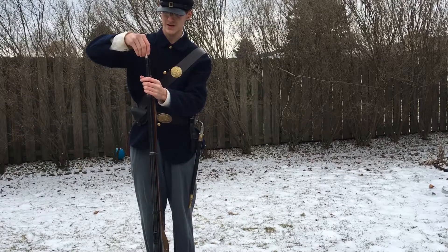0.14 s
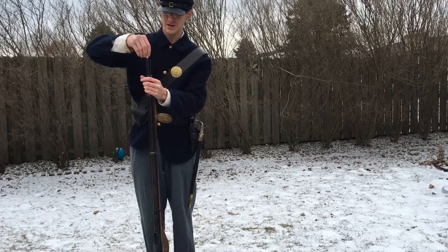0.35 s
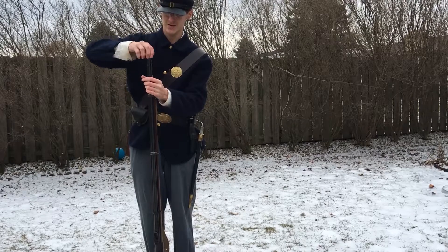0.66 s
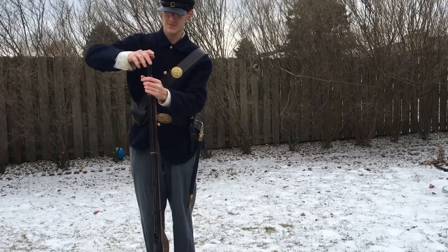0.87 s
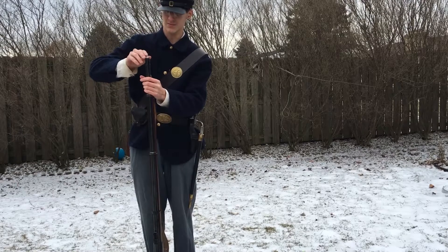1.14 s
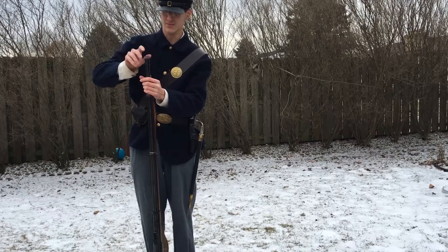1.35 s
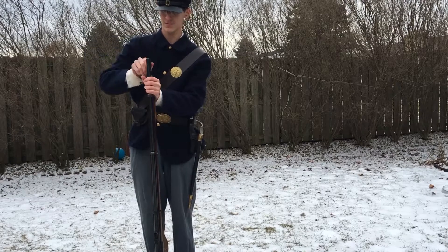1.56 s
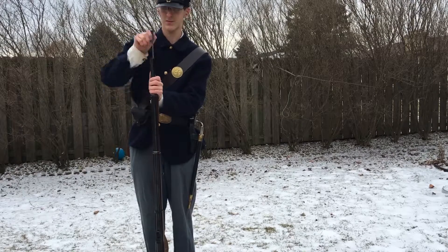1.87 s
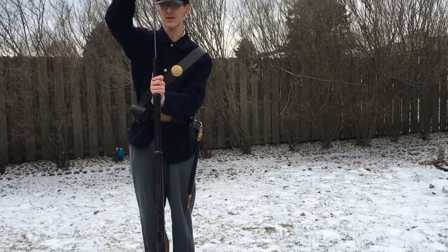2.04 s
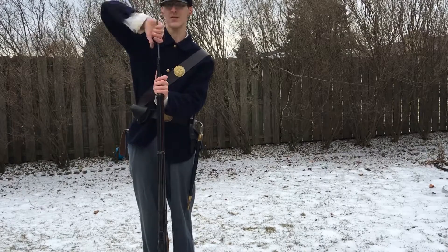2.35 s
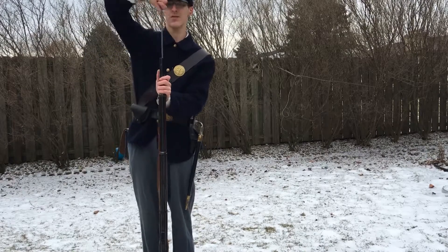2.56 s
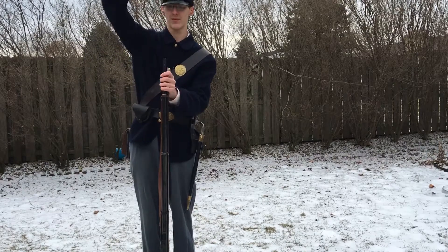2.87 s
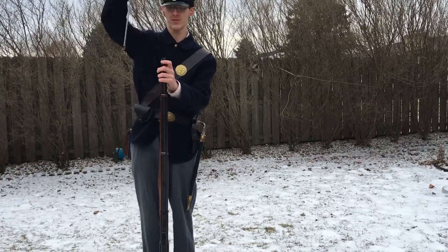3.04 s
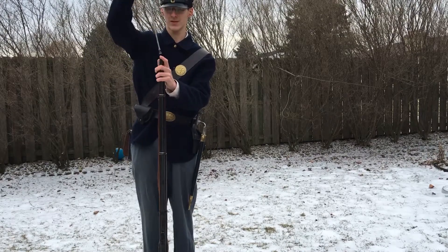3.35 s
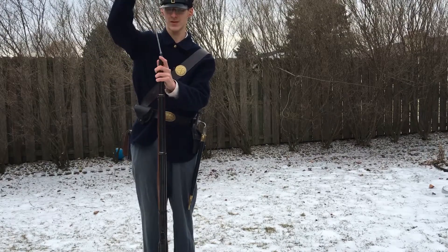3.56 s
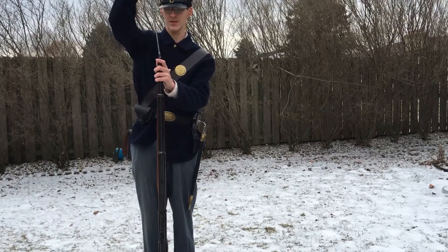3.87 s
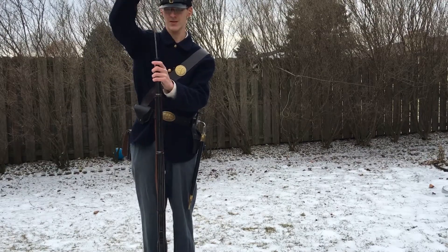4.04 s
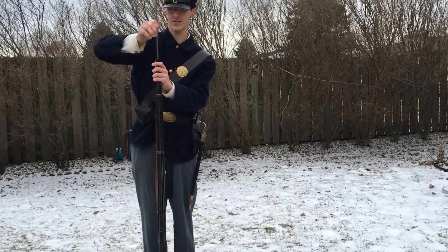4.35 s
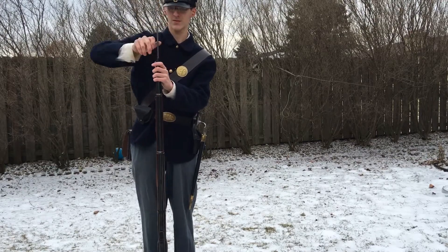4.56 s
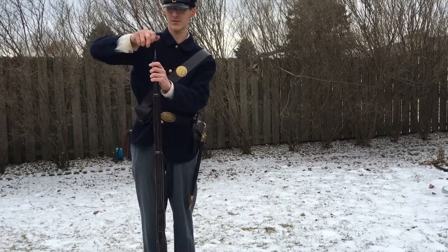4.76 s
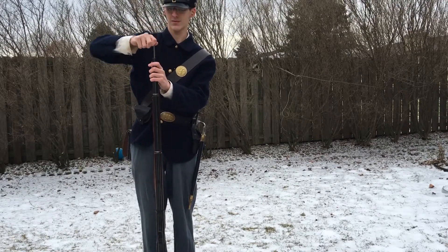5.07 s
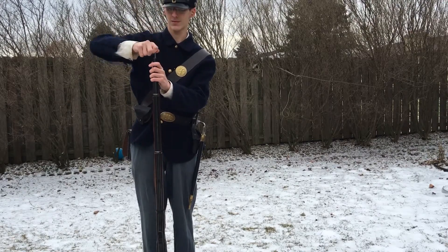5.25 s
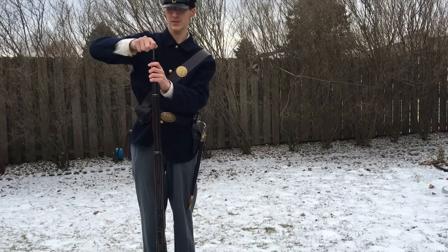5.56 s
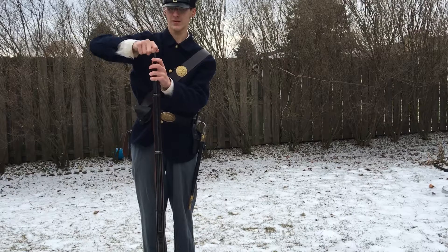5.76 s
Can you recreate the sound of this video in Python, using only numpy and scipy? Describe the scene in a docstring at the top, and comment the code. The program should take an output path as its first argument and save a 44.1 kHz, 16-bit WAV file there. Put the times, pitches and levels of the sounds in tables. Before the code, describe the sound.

Outdoors, a metal ramrod slides and clinks in a rifle barrel and is tamped three times, over faint wind and distant traffic.

```python
"""A quiet yard, where a steel ramrod is drawn, turned, dropped down a rifle barrel and rammed home.
Impacts excite the barrel's damped modes and sliding friction adds noise; both set the rod's bending
modes ringing while the hand lets go. At the bottom of the bore the rod pushes the air into a thump.
Fence and ground scatter the sound. Far traffic hums and light wind buffets the microphone over faint hiss."""
import sys
import numpy as np
from scipy import signal
from scipy.fft import rfft, irfft, next_fast_len
from scipy.io import wavfile
from scipy.ndimage import map_coordinates

SR = 44100
rng = np.random.default_rng(int(sys.argv[2]) if len(sys.argv) > 2 else 0)


def to_wav(s):
    """Save 16-bit WAV."""
    ch = np.atleast_2d(s).T  # columns
    pcm = np.round(np.clip(ch, -1, 1) * 32767)  # PCM
    wavfile.write(sys.argv[1], SR, pcm.astype(np.int16))


N = 260631


def amp(db):
    """Amplitude ratio of a level in decibels."""
    return 10 ** (np.asarray(db) / 20)


def unit(x):
    """Normalisation to rms 1."""
    return x / np.sqrt(np.mean(x ** 2) + 1e-20)


def wobble(rate_hz, size=N):
    """Slow random modulation: a spline through rate_hz Gaussian knots a second."""
    knots = rng.standard_normal(int(size * rate_hz / SR) + 4)
    return map_coordinates(knots, [np.arange(size) * rate_hz / SR])


def filtered(x, response):
    """Linear filtering: the spectrum of x times a frequency response."""
    size = next_fast_len(len(x) + SR // 4)
    return irfft(rfft(x, size) * response(np.fft.rfftfreq(size, 1 / SR)), size)[:len(x)]


def coloured(x, spectrum):
    """Spectral shaping by (frequency_hz, level_db) points on a log axis, to rms 1."""
    points_hz, db = np.transpose(spectrum)
    return unit(filtered(x, lambda hz: amp(np.interp(np.log(hz + 1), np.log(points_hz + 1), db))))


def resonant(x, modes):
    """Forced response of (frequency_hz, bandwidth_hz, level_db) modes, summed with alternating sign."""
    return filtered(x, lambda f: sum(
        (-1) ** k * amp(db) * 1j * f * width / (hz * hz - f * f + 1j * f * width)
        for k, (hz, width, db) in enumerate(modes)))


def add(track, start_s, sound):
    """Superposition of sound on track from start_s."""
    part = track[round(start_s * SR):][:len(sound)]
    part += sound[:len(part)]


# Noise spectra of far traffic and of faint hiss: frequency_hz, density_db
TRAFFIC_SPECTRUM = [(71, -54), (120, -8), (276, -18), (376, -18.5), (452, -19), (492, -18), (773, -21),
                    (916, -21.5), (1730, -37), (3500, -57.5), (4550, -83), (7700, -120)]
HISS_SPECTRUM = [(1470, -15), (2500, -2), (2940, -16), (3160, 0), (4730, -7), (5190, -4.5), (8140, -4.5),
                 (14800, -2), (16000, -7)]
def yard(traffic_db=-57, hiss_db=-75):
    """Ambient noise: the low hum of far traffic drifts in level over a steady hiss."""
    drift = amp(1.1 * wobble(1.52) + 1.14 * wobble(12))
    traffic = coloured(drift * rng.standard_normal(N), TRAFFIC_SPECTRUM)
    hiss = coloured(rng.standard_normal(N), HISS_SPECTRUM)
    return amp(traffic_db) * traffic + amp(hiss_db) * hiss


# Strength of the buffeting: time_s, level_db
BUFFET_LEVELS = [(0, -49.5), (.15, -52), (.9, -51.5), (1.07, -47.5), (1.63, -45.5), (1.87, -47.5),
                 (2.32, -48), (2.8, -45.5), (2.9, -51.5), (3.6, -51.5), (4.03, -56.5), (4.4, -51),
                 (4.78, -44), (5.06, -55), (5.13, -52.5), (5.54, -50.5), (5.91, -55)]
# Spectrum of the buffeting: frequency_hz, density_db
BUFFET_SPECTRUM = [(12, -61), (20, -17.5), (46, 0.5), (70, 3), (124, -6.5), (198, -21.5), (250, -30),
                   (320, -22.5), (550, -120)]
# Single puffs: centre_s, peak_db, length_s
WIND_PUFFS = [(0.081, -37, 0.04), (0.415, -37.5, .028), (0.616, -37, 0.02), (.69, -36.5, 0.024),
              (3.198, -24.5, 0.018), (3.25, -38, 0.026), (3.402, -27.5, 0.0077), (3.483, -36, .058),
              (5.295, -40, .055), (5.549, -42.5, 0.049), (5.666, -48, 0.025)]
def wind(puff_hz=67):
    """Pressure fluctuation at the microphone: uneven low noise, with puffs as short Gaussian pulses."""
    lumps = amp(1.6 * wobble(14) + 1.4 * wobble(40)) * rng.standard_normal(N)
    level_db = np.interp(np.arange(N) / SR, *np.transpose(BUFFET_LEVELS))
    out = amp(level_db) * coloured(lumps, BUFFET_SPECTRUM)
    t = np.arange(-SR // 20, SR // 10) / SR
    for centre_s, peak_db, length_s in WIND_PUFFS:
        envelope = amp(peak_db) * np.exp(-(t / (.5 * length_s)) ** 2)
        add(out, centre_s + t[0], envelope * np.cos(2 * np.pi * puff_hz * t + 3.2))
    return out


def fence_echo(x, t60_s=.11, delay_s=.004):
    """Scattering from fence and ground: convolution with a short, decaying noise tail."""
    t = np.arange(SR // 5) / SR
    tail = rng.standard_normal(len(t)) * amp(-60 * t / t60_s) * (t > delay_s)
    return signal.fftconvolve(x, tail / np.linalg.norm(tail))[:N]


# Hollow knock, then deeper push of air, as the rod lands:
# start_s, level_db, start_hz, end_hz, glide_s, t60_s
LANDING_THUMPS = [(4.634, -39.5, 580, 440, .011, .075), (4.657, -34, 290, 94, .013, .085)]
# Ramming blows at the bottom of the bore: start_s, level_db
RAM_THUMPS = [(5.298, -20.5), (5.51, -17.5), (5.697, -16.5)]
# Tone shared by those blows: start_hz, end_hz, glide_s, t60_s
RAM_TONE = (268, 127, 0.0048, .026)
def bore_thumps():
    """Damped oscillation of the air column, its pitch falling as the pressure escapes."""
    out, t = np.zeros(N), np.arange(SR // 5) / SR
    rams = [blow + RAM_TONE for blow in RAM_THUMPS]
    for start_s, level_db, start_hz, end_hz, glide_s, t60_s in LANDING_THUMPS + rams:
        hz = end_hz + (start_hz - end_hz) * np.exp(-t / glide_s)
        envelope = amp(level_db - 60 * t / t60_s) * (1 - np.exp(-t / .0025))
        add(out, start_s, -envelope * np.sin(2 * np.pi * np.cumsum(hz) / SR))
    return out


def grip(t, stop_s, t60_s=.03):
    """Damping by a closing hand: exponential decay from stop_s."""
    return amp(-60 * np.maximum(t - stop_s, 0) / t60_s)


# Bending modes of the rod: frequency_hz
ROD_MODES_HZ = [2584, 3628, 3905, 4375, 5170, 5400, 5959, 6540, 7160, 7790, 8450, 9100, 9790, 10520, 11260,
                12100, 12800, 13600, 14510, 15320]
# Spells of loose grip: start_s, stop_s, gain_db, t60_s
LOOSE_GRIPS = [(1.75, 2.05, -2.5, 0.18), (2.03, 2.22, -11, 0.14), (2.35, 2.49, -14, 0.065),
               (2.485, 2.7, -7, 0.087), (4.28, 4.66, -6.5, 0.21), (5.08, 5.91, -28, 0.045)]
def held_rod(contact):
    """Forced vibration: contacts drive the rod's bending modes while the fingers damp them."""
    out, t = np.zeros(N), np.arange(N) / SR
    for start_s, stop_s, gain_db, t60_s in LOOSE_GRIPS:
        width_hz = np.log(1000) / np.pi / t60_s
        mode_db = gain_db - 10 * np.log10(width_hz)  # offsets the smaller power a narrow mode gathers
        # short waves radiate better: 8 dB an octave
        modes = [(hz, width_hz, mode_db + 8 * np.log2(hz / 1000)) for hz in ROD_MODES_HZ]
        span = slice(round(start_s * SR), round((stop_s + .05) * SR))
        out[span] += grip(t[span], stop_s) * resonant(contact[span] * (t[span] < stop_s), modes)
    return out


# Free ring of each of the rod's modes: level_db, t60_s
ROD_DECAYS = [(-3, 1.3), (0, .3), (-7, .6), (-5, .3), (-5, .25), (-9, .5), (-17, 1.0), (-12, 1.0), (-8, .5),
              (-14, 1.0), (-11, 1.4), (-9, .8), (-11, .7), (-11, .35), (-16, .5), (-5, .18), (-9, .3),
              (-15, .4), (-9, .22), (-12, .3)]
# Ring of the dropped rod until it is caught: start_s, stop_s, level_db
ROD_DROP = (4.632, 4.925, -57)
def dropped_rod():
    """Free vibration: each bending mode decays at its own rate until the hand closes."""
    out, t = np.zeros(N), np.arange(SR // 2) / SR
    start_s, stop_s, level_db = ROD_DROP
    for hz, (mode_db, t60_s) in zip(ROD_MODES_HZ, ROD_DECAYS):
        beat_db = 3.5 * wobble(30, size=len(t))  # stands for the beating of close pairs of modes
        envelope = amp(level_db + mode_db + beat_db - 60 * t / t60_s) * (1 - np.exp(-t / .01))
        tone = np.sin(2 * np.pi * (hz * t + rng.random()))
        add(out, start_s, envelope * grip(t, stop_s - start_s) * tone)
    return out


# The rod slipping down the bore: time_s, level_db, treble_db, echo_delay_ms
SLIDE_PATH = [(4.0, -81, -7, .8), (4.03, -70, -6, 1.1), (4.2, -63.5, -0.5, 2.0), (4.3, -62.5, 1, 2.4),
              (4.4, -61.5, -3, 2.3), (4.535, -61, -2, 2.9), (4.55, -85, -2, 2.9)]
# Spectrum of steel on skin: frequency_hz, density_db
SLIDE_SPECTRUM = [(880, -17), (1500, -5), (1720, -5), (2100, -3.5), (2510, -7.5), (5380, -12), (6120, -22),
                  (7920, -25), (12400, -13.5), (16000, -21)]
def finger_slide():
    """Comb filtering: steel hisses through fingers, and lengthening bore echoes sweep the comb down."""
    n = np.arange(N)
    t = n / SR
    hiss = rng.standard_normal(N) * amp(1.2 * wobble(100) + 1.5 * wobble(500))
    time_s, level_db, treble_db, delay_ms = np.transpose(SLIDE_PATH)
    lag = (np.interp(t, time_s, delay_ms) + .04 * wobble(25)) * SR / 1000
    echoes = sum(.7 ** k * map_coordinates(hiss, [n - k * lag]) for k in range(1, 4))
    # the bore answers best near 5 kHz
    echoes = filtered(echoes, lambda hz: np.exp(-(np.log(hz / 5000 + 1e-9) / .36) ** 2))
    combed = coloured(hiss + echoes * amp(2.6 * wobble(11)), SLIDE_SPECTRUM)
    body = filtered(combed, lambda hz: hz < 6000)
    treble = amp(np.interp(t, time_s, treble_db)) * unit(combed - body)
    gain = amp(np.interp(t, time_s, level_db, left=-np.inf, right=-np.inf))
    return gain * (unit(body) + treble)


# Rubbing strokes of steel or cloth: peak_s, rise_s, hold_s, fall_s, level_db, treble_db
RUB_STROKES = [(.01, 0.057, 0.51, 0.77, -86.5, 10.5), (0.176, .09, .003, .04, -87, 4),
               (0.362, .02, 0.026, 0.06, -72.5, 8.5), (0.542, .05, .005, 0.11, -76, 7.5),
               (0.67, .07, 0.034, 0.091, -67, 6), (0.855, .02, 0.026, 0.12, -71, 5.5),
               (1.175, .003, 0.054, .02, -70, 10.5), (1.796, 0.033, 0.07, .1, -59, -21),
               (1.913, 0.12, 0.087, 0.068, -42.5, -2.5), (2.062, 0.034, .04, 0.16, -53, -5.5),
               (2.12, .025, 0.021, 0.046, -50.5, 0.5), (2.456, 0.015, 0.023, 0.033, -49, -17),
               (2.523, 0.046, 0.027, 0.08, -56, -1.5), (2.601, 0.069, 0.03, 0.027, -51, -0.5),
               (2.666, .02, 0.018, 0.23, -73.5, -0.5), (3.575, .01, .21, .02, -71, -12),
               (3.96, .045, .003, 0.015, -62, -20), (4.319, 0.014, 0.051, .03, -47, 1.5),
               (4.55, .008, 0.039, .08, -53.5, 1), (4.649, 0.032, .005, 0.048, -49, -12),
               (4.68, .03, .03, 0.27, -61.5, -6), (5.123, .01, .005, 0.13, -56, -5.5),
               (5.373, 0.086, .003, 0.16, -53.5, -9.5), (5.58, 0.13, .01, .35, -63, -8),
               (5.763, .01, 0.08, .1, -70, -17)]
def stroke_gains(swell_db=21, rise_curve=1.17, treble_slope=1.51):
    """Friction noise grows with speed: strokes swell, hold and fade, the treble more steeply."""
    t = np.arange(0, N / SR, .001)
    peak_s, rise_s, hold_s, fall_s, level_db, treble_db = np.transpose(RUB_STROKES)[:, :, None]
    rising = np.maximum((peak_s - t) / rise_s, 0) ** rise_curve
    falling = np.maximum((t - peak_s - hold_s) / fall_s, 0)
    envelope_db = -swell_db * (rising + falling)
    body = amp(level_db + envelope_db).sum(0)
    treble = amp(level_db + treble_db + treble_slope * envelope_db).sum(0)
    return [np.interp(np.arange(N) / SR, t, gain) for gain in (body, treble)]


# Spectra of a scrape's body and treble: frequency_hz, density_db
SCRAPE_BODY = [(650, -38), (1100, -8), (1420, -5), (1600, -16), (2300, 3), (2990, -18.5), (3600, 2),
               (6000, -14), (7800, -49), (13200, -120)]
SCRAPE_TREBLE = [(3530, -9), (6000, -6), (7100, -2.5), (7710, -9.5), (8370, -4), (10500, -9), (12100, -6),
                 (15000, -14), (16000, -23)]
def scrapes():
    """Sliding friction: rough steel slips in clumps of tiny grains that excite the barrel's modes."""
    body_gain, treble_gain = stroke_gains()
    clumps_db = 1.2 * wobble(45) + 2.8 * wobble(400)
    grains, fine_grains = (rng.standard_normal(N) * amp(clumps_db + 1.4 * wobble(90)) for _ in range(2))
    middle_modes = [mode for mode in BARREL_MODES if 1500 < mode[0] < 5000]
    body = unit(coloured(grains, SCRAPE_BODY) + .8 * unit(resonant(grains, middle_modes)))
    deep = filtered(body, lambda hz: 1 / (1 + (hz / 2600) ** 8))
    # a dull stroke also loses its upper body
    upper_gain = np.minimum(.84 * body_gain, .81 * np.sqrt(body_gain * treble_gain))
    treble = coloured(fine_grains, SCRAPE_TREBLE)
    return amp(-1) * (body_gain * deep + upper_gain * (body - deep) + treble_gain * treble)


# Damped modes of the barrel in its stock: frequency_hz, bandwidth_hz, level_db
BARREL_MODES = [(1160, 130, -3), (1645, 120, 0), (2250, 200, -2), (2880, 140, 0), (3510, 200, -4),
                (4400, 150, -8), (5220, 160, -12), (5900, 250, -15), (6530, 220, -16), (7250, 150, -12),
                (8580, 270, -15), (9900, 280, -17), (11300, 150, -17), (12800, 150, -24)]
# Impacts of rod on barrel: start_s, level_db, treble_db, pitch_hz
IMPACTS = [(0.2452, -51.5, 6.5, 1540), (.2558, -53.5, 13, 4630), (0.3617, -49, -12, 1520),
           (0.422, -50, 3, 1770), (0.544, -51, -8, 1840), (0.6672, -37, -6, 1590),
           (.836, -37.5, -1.5, 1450), (.9634, -58, 2.5, 2230), (1.5735, -37, -17, 2850),
           (1.6852, -42, -20, 4100), (1.746, -41, -12, 1710), (1.921, -30.5, 6, 2060),
           (2.116, -34, -8, 1570), (2.366, -31, -28, 1750), (2.3738, -33.5, 1, 1900),
           (2.44, -38, -9.5, 1420), (2.4613, -34, 2, 1430), (2.549, -36.5, -3.5, 1540),
           (3.5524, -29.5, -16, 2860), (3.554, -28.5, -26, 1620), (3.5892, -52, -28, 3180),
           (3.614, -41, -27, 1510), (3.6613, -46.5, -22, 2590), (3.944, -51, -26, 1690),
           (3.9875, -40, 6, 1690), (4.3048, -26.5, 1, 3540), (4.4627, -26.5, -2.5, 3600),
           (4.4748, -32, -24, 2280), (4.49, -30.5, -17, 3570), (4.538, -28.5, 2, 2240),
           (4.5444, -29.5, -5, 1520), (4.5774, -30, -24, 3540), (4.599, -25, -10, 2980),
           (4.6086, -11.5, -15, 2470), (4.6313, -33, 5, 2110), (4.637, -31, -18, 750),
           (4.6429, -28, -12, 2070), (4.697, -29.5, -22, 1560), (4.7265, -40, -12, 1620),
           (4.9243, -36.5, -23, 1440), (5.1103, -28, 0, 1760), (5.1507, -32, -32, 1500),
           (5.2934, -36.5, -5, 4230), (5.3043, -20, -4.5, 2780), (5.3739, -28, -26, 1560),
           (5.3869, -32.5, 0, 3220), (5.5084, -36.5, 0, 4300), (5.5546, -24, -33.5, 1900),
           (5.5664, -52, -3, 1550), (5.5946, -30.5, -5, 1640), (5.6217, -43, -22, 1640),
           (5.6435, -52, -22, 2850), (5.696, -32, -2.5, 4430), (5.735, -25.5, -12.5, 2500),
           (5.7723, -47, -22, 1740), (5.797, -38.5, -27, 1600), (5.842, -43.5, -22, 1660),
           (5.857, -39.5, -13.5, 1610)]
def clinks(t60_s=.026, split_hz=5000):
    """Impact excitation: a crack of noise plus the barrel's modes; the spot struck favours one pitch."""
    out, t = np.zeros(N), np.arange(SR // 10) / SR
    hz, _, mode_db = np.transpose(BARREL_MODES)[:, :, None]
    is_low = hz[:, 0] < split_hz
    treble_band = signal.butter(1, (split_hz, 13000), "bandpass", fs=SR)
    for start_s, level_db, treble_db, pitch_hz in IMPACTS:
        attack_s = .0003 * amp(-.6 * treble_db)  # a dull blow is a slow one
        envelope = amp(level_db - 11.5 - 60 * t / t60_s) * (1 - np.exp(-t / attack_s))
        strength, detune, phase = rng.standard_normal((3, len(hz), 1))
        spot_db = np.where(hz < split_hz, -11 * np.abs(np.log2(hz / pitch_hz)), 0)
        tones = np.sin(2 * np.pi * hz * (1 + .02 * detune) * t + phase)
        rings = amp(mode_db + spot_db + 3.5 * strength) * tones
        body_band = signal.butter(2, (pitch_hz / 1.9, pitch_hz * 2.1), "bandpass", fs=SR)
        crack = rng.standard_normal((2, len(t)))
        body = unit(rings[is_low].sum(0)) + 1.1 * unit(signal.lfilter(*body_band, crack[0]))
        treble = .51 * unit(rings[~is_low].sum(0)) + .95 * unit(signal.lfilter(*treble_band, crack[1]))
        add(out, start_s, envelope * (body + amp(treble_db + 4.5) * treble))
    return out


def scene():
    """Superposition of rifle, echo, wind and yard in one channel."""
    contact = clinks() + scrapes() + finger_slide()
    rifle = contact + held_rod(contact) + dropped_rod() + bore_thumps()
    return (rifle + amp(-14) * fence_echo(rifle) + wind() + yard())[None]


# Overall frequency response: frequency_hz, gain_db
RESPONSE = [(15, -25), (40, 4), (60, 3.5), (9800, -2), (10600, -5.5), (11500, -2.5), (14500, -5.5),
            (15500, -4), (16000, -13)]
def record(dry):
    """Frequency response: lifted bass, a dip in the treble, and no sound above 16 kHz."""
    points_hz, gain_db = np.transpose(RESPONSE)
    return filtered(dry[0], lambda hz: amp(np.interp(hz, points_hz, gain_db)) * (hz < 16000))[None]


dry = scene()
out = record(dry)
to_wav(out)
```